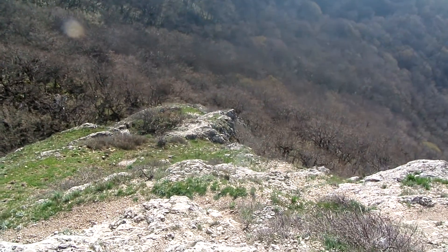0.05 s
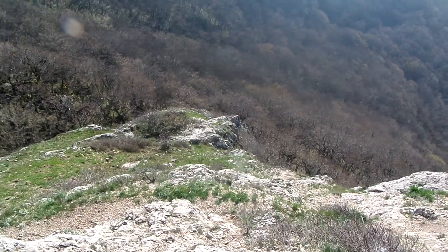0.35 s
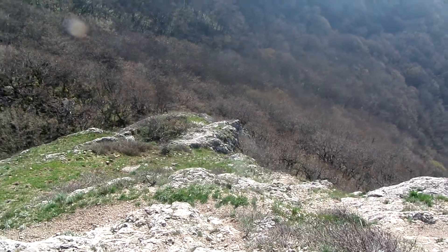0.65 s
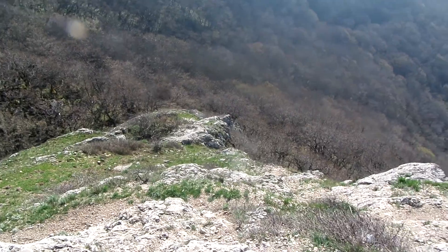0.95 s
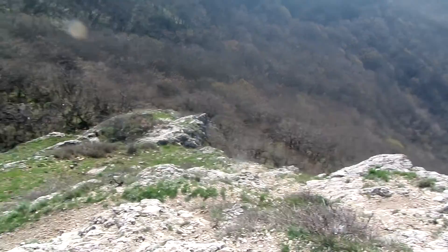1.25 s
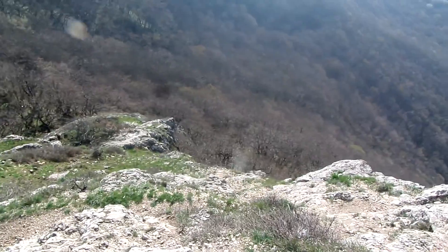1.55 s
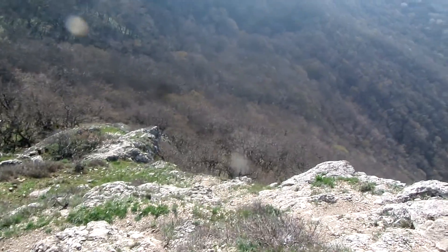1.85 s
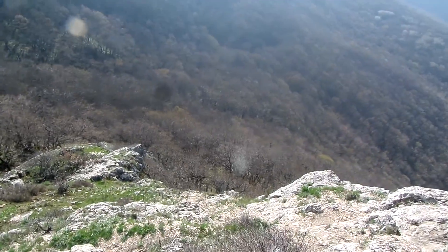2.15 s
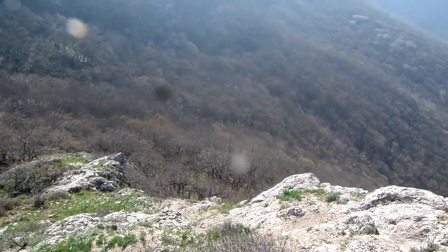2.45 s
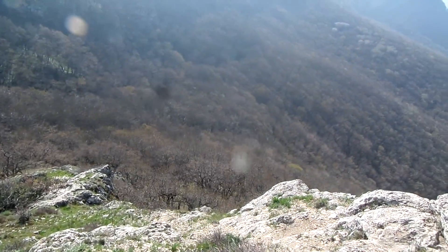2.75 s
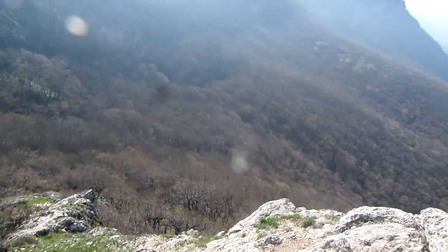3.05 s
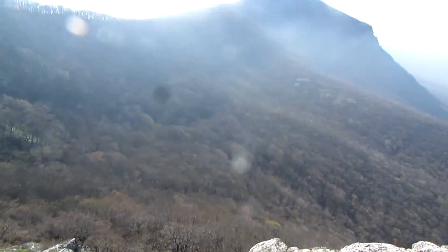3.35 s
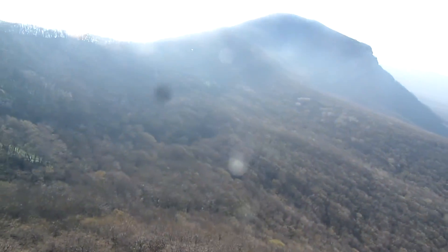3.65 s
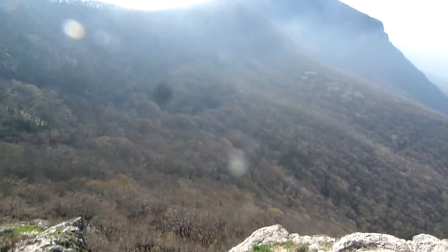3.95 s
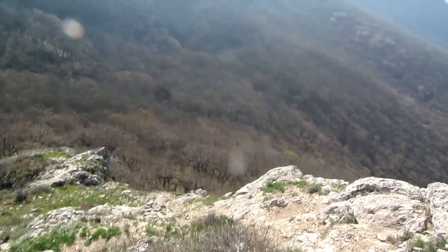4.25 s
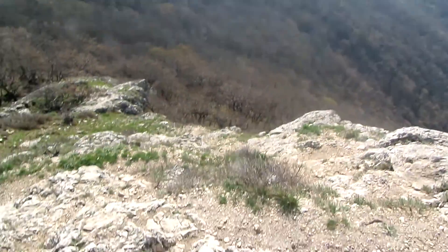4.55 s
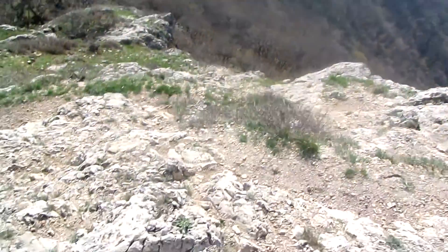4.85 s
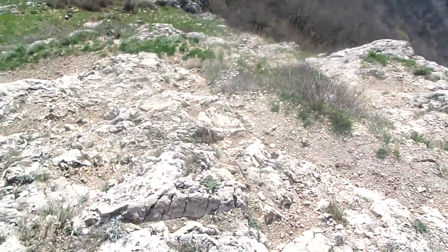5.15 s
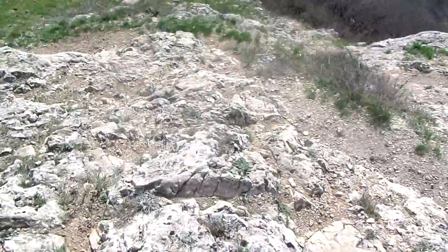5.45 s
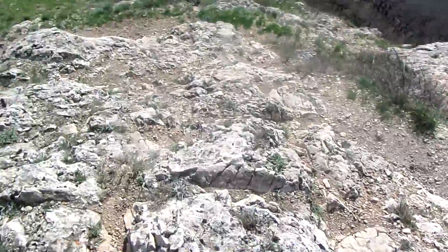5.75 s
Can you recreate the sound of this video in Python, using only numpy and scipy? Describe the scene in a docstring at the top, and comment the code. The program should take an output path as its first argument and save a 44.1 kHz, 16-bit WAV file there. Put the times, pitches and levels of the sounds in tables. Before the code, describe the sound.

On a quiet, stony hilltop, a soft breeze hisses in the grass and lightly buffets the microphone while small birds whistle far off. Close by, a shoe scrapes and crunches on grit, and a stone snaps loudly. Several quick dry scrapes follow. After that there are only faint rustles, scattered ticks of small stones and one light knock, as the gentle wind and birds carry on.

```python
"""A stony hilltop above a wooded valley, where someone shifts about with a small camera in hand.
Soft gusts murmur, hiss in the grass and buffet the microphone; small birds whistle and echo off a slope.
Close by, quick dry scrapes and crunching grit are made of thousands of tiny slips, and small stones tick.
One stone snaps loudly and another knocks, each ringing briefly; the snap makes the camera duck its level."""
import sys
import numpy as np
from scipy import signal
from scipy.fft import rfft, irfft, next_fast_len
from scipy.io import wavfile
from scipy.ndimage import uniform_filter1d

SR = 44100
rng = np.random.default_rng(int(sys.argv[2]) if len(sys.argv) > 2 else 0)


def int16_out(signal):
    """Quantize to a 16-bit WAV file."""
    q = np.round(np.clip(np.atleast_2d(signal).T, -1, 1) * 32767)
    wavfile.write(sys.argv[1], SR, q.astype(np.int16))


N = 265393
T = np.arange(N) / SR


def undb(db):
    """Decibels to gain."""
    return 10 ** (np.asarray(db) / 20)


def unit(x):
    """Scale to rms 1."""
    return x / (np.std(x) + 1e-12)


def shape(x, gain):
    """Filter by a function of frequency that gives the gain; rms 1."""
    size = next_fast_len(len(x))
    hz = np.maximum(np.arange(size // 2 + 1) * SR / size, 1)
    return unit(irfft(rfft(x, size) * gain(hz), size)[:len(x)])


def colour(x, points):
    """EQ through (Hz, dB) points joined on a log-frequency axis; rms 1."""
    f, db = np.transpose(points)
    return shape(x, lambda hz: undb(np.interp(np.log(hz), np.log(f), db)))


def band(x, centre_hz, octaves):
    """Keep a bell-shaped band."""
    return shape(x, lambda hz: np.exp(-.5 * (np.log2(hz / centre_hz) / octaves) ** 2))


def resonance(x, centre_hz, width_hz):
    """Ring a resonance with steep skirts."""
    return shape(x, lambda hz: 1 / (1 + ((hz - centre_hz ** 2 / hz) / width_hz) ** 2))


def add(out, s, x):
    """Mix x into out from time s."""
    i = max(int(s * SR), 0)
    out[i:i + len(x)] += x[:max(len(out) - i, 0)]


def clock(length):
    """Sample times of a short sound."""
    return np.arange(max(int(length * SR), 16)) / SR


def decay(t, t60):
    """A tail that falls 60 dB in t60 seconds."""
    return np.exp(-np.log(1000) * t / t60)


def walk(rate):
    """A smooth random drift through about rate values a second; rms 1."""
    hold = int(SR / rate)
    steps = np.repeat(rng.standard_normal(N // hold + 1), hold)
    return unit(uniform_filter1d(uniform_filter1d(steps, hold), hold)[:N])


def slips(rate, spread_db):
    """Friction: tiny slips at random moments, a few much larger than the rest."""
    clicks = (rng.random(N) < rate / SR) * rng.choice([-1, 1], N)
    return clicks * undb(spread_db * np.minimum(rng.exponential(size=N), 5))


def swells(table, octaves):
    """Short bands of noise that rise and fade smoothly."""
    out, t = np.zeros(N), clock(.6)
    t -= t.mean()
    for s, length, db, hz in table:
        swell = band(rng.standard_normal(len(t)), hz, octaves) * np.exp(-2 * (t / length) ** 2)
        out += undb(db) * np.interp(T - s, t, swell, left=0, right=0)
    return out


def strike(contacts, modes, push_s):
    """Each contact rings the same modes as its push builds; a small body radiates no deep bass."""
    out, t = np.zeros(N), clock(.06)
    ring = sum(undb(db) * decay(t, t60) * np.sin(2 * np.pi * hz * t) for hz, db, t60 in modes)
    for s, db in contacts:
        add(out, s, undb(db) * ring * (1 - np.exp(-t / push_s)))
    return signal.sosfilt(signal.butter(2, 85, "high", fs=SR, output="sos"), out)


# EQ curves of the three wind layers. Each row: frequency in Hz, gain in dB.
VALLEY_EQ = [(20, -17.5), (60, -6.5), (140, -0.5), (230, 0.5), (310, 0), (400, 0.5), (520, -2), (700, -8),
             (1100, -17), (3000, -38)]
GRASS_EQ = [(200, -17), (600, -0.5), (950, 0), (1700, -2), (2700, -3), (4500, -5.5), (6500, -10),
            (10000, -19.5)]
HISS_EQ = [(1000, -34.5), (3500, -10.5), (5500, 1.5), (8500, 1), (12000, 2), (15000, 1), (16000, 0)]
# Soft gusts. Each row: peak time and spread in seconds, then valley, grass and hiss levels in dB.
GUSTS = [(.1, 0.28, -64, -64.5, -77), (.7, .19, -63, -56.5, -58), (3.08, 0.22, -59, -64.5, -63),
         (4.62, 0.34, -57.5, -59.5, -61.5), (6.0, 0.32, -62, -60, -57)]


def breeze():
    """Gusts swell over calm air: a murmur in the valley, the near grass and, just after, a fine hiss."""
    out = np.zeros(N)
    layers = [(VALLEY_EQ, -63, 0), (GRASS_EQ, -64, 0), (HISS_EQ, -64.5, 0.13)]
    for k, (eq, calm_db, lag_s) in enumerate(layers):
        gust_power = sum(undb(levels[k]) ** 2 * np.exp(-.5 * ((T - peak - lag_s) / spread) ** 2)
                         for peak, spread, *levels in GUSTS)
        flicker = undb(.5 * walk(8.1))
        out += np.sqrt(undb(calm_db) ** 2 + gust_power) * flicker * colour(rng.standard_normal(N), eq)
    return out


# Low puffs of wind. Each row: peak time and length in seconds, level in dB, pitch in Hz.
BUFFETS = [(.06, 0.14, -59, 44.6), (.26, 0.054, -54, 44.7), (.35, 0.067, -59, 45), (1.91, 0.082, -65, 50),
           (2.61, 0.034, -66, 64), (3.8, .11, -63, 38), (3.805, 0.048, -56.5, 106)]


def buffets():
    """Wind hits the microphone in short, soft rumbles."""
    return swells(BUFFETS, octaves=0.48)


def whistle(length, start_hz, glide, waver):
    """One wavering note that holds its pitch at first, then slides ever faster by glide octaves."""
    progress = clock(length) / length
    wobble = unit(uniform_filter1d(rng.standard_normal(len(progress)), size=160))
    hz = start_hz * 2 ** (glide * progress ** 1.6) * (1 + waver * wobble)
    return np.abs(np.sin(np.pi * progress)) ** 0.33 * np.sin(2 * np.pi * np.cumsum(hz) / SR)


# Single calls. Each row: start and length in seconds, pitch in Hz, glide in octaves, level in dB.
BIRD_CALLS = [(0.112, 0.034, 3710, -.1, -62), (.13, 0.084, 3170, -0.089, -65),
              (0.117, 0.14, 7040, -0.011, -65.5), (.33, 0.18, 3160, -.07, -66),
              (1.374, 0.22, 3590, -0.026, -61.5), (2.852, 0.091, 7700, -.12, -70),
              (4.55, 0.089, 4220, -0.012, -64), (4.585, .04, 7660, -.12, -63), (4.668, .03, 4750, 0, -62),
              (4.716, .06, 6650, -.02, -66), (4.744, .035, 6470, -.2, -64),
              (4.89, 0.029, 5720, -0.055, -60), (4.933, .036, 6800, -.06, -53.5),
              (4.963, 0.041, 6580, -.2, -60), (5.102, 0.11, 5270, -0.15, -60), (5.168, 0.082, 3670, 0, -58),
              (5.494, 0.023, 7220, 0.063, -53), (5.733, .15, 3335, -0.018, -63.5),
              (5.835, 0.045, 5800, -0.23, -65)]
# Far, rapid song. Each row: start and end in seconds, level in dB, centre pitch in Hz.
TRILLS = [(0.02, .168, -60, 4400), (2.803, 3.1, -62, 4430), (3.102, 3.45, -60.5, 4800)]


def birds(echo_db, echo_t60, notes_per_s=15):
    """Whistled glides and runs of far, warbled notes; the wooded slope scatters them back."""
    out = np.zeros(N)
    for s, length, hz, glide, db in BIRD_CALLS:
        add(out, s, undb(db) * whistle(length, hz, glide, waver=0.011))
    for start, end, db, hz in TRILLS:
        for s in np.arange(start, end, 1 / notes_per_s):
            detune, bend = rng.uniform(-1, 1, 2)  # every note has its own contour
            note = whistle(.6 / notes_per_s, hz * (1 + .12 * detune), 0.248 * bend, waver=0.0802)
            add(out, s + .015 * rng.random(), undb(db) * note)
    t = clock(1)
    echo = rng.standard_normal(len(t)) * decay(t, echo_t60) * (1 - np.exp(-t / 0.018))
    return out + undb(echo_db) * signal.fftconvolve(out, echo / np.linalg.norm(echo))[:N]


# Faint rustles. Each row: peak time and length in seconds, level in dB, pitch in Hz.
RUSTLES = [(.69, 0.26, -60.5, 1050), (2.02, 0.18, -68.5, 3500), (3.0, 0.29, -68, 2200),
           (3.968, 0.015, -56, 2670), (4.07, .04, -64, 2800), (4.265, 0.034, -58.5, 2750),
           (4.455, 0.032, -61, 2580), (4.612, 0.022, -56.5, 2630), (4.695, 0.016, -56.5, 2700),
           (5.33, 0.16, -61.5, 2930)]


def rustles():
    """A gust swelling in the grass and small movements make narrow, breathy swells of noise."""
    return swells(RUSTLES, octaves=0.31)


# The bump's hit. Each row: time in seconds, strength in dB.
BUMP_HITS = [(2.4642, -32.5)]
# Its low body. Each row: pitch in Hz, level in dB, seconds to fall 60 dB.
BUMP_MODES = [(134, 7.5, 0.0066), (310, 1, 0.0086)]


def bump():
    """One soft contact gives a low thud that dies at once."""
    return strike(BUMP_HITS, BUMP_MODES, push_s=0.00035)


# EQ curves of a scrape's bright body and the dull rub below. Each row: frequency in Hz, gain in dB.
SCRAPE_EQ = [(100, -24), (1000, -35), (1900, -5.5), (2550, 6), (3300, 0.5), (4400, 2.5), (5400, 3.5),
             (6200, -0.5), (7500, 0.5), (10000, -5), (16000, -45)]
SCUFF_EQ = [(30, -8.5), (140, 7.5), (400, 4.5), (800, 5), (1200, -2), (1650, -2), (2400, -2.5), (8000, -16)]
# Dry strokes. Each row: start, end and fade in seconds, level in dB, relative speed, hollow tone in dB.
SCRAPES = [(0.992, 1.19, 0.047, -42, 1.325, -15.5), (1.444, 1.525, 0.031, -54, 0.71, -16),
           (1.618, 1.675, 0.024, -61, 0.93, 0), (1.835, 1.977, 0.058, -40.5, 0.93, -19),
           (2.03, 2.17, 0.053, -50.5, 0.92, -16), (2.158, 2.265, 0.061, -52, 1.0, -8.5),
           (2.278, 2.463, 0.069, -50, 1.18, -4), (2.446, 2.512, .026, -52, 1.32, -28)]


def scrapes(firm_db=-43, ring_hz_per_db=19, sag_db_per_s=14):
    """Dense slips excite a body and two resonances; faster strokes gain scuff and a brighter hiss."""
    out = np.zeros(N)
    friction = [slips(rate=14000, spread_db=3.0) for _ in range(5)]
    grip = undb(2.6 * walk(70))  # the contact catches unevenly, so the ring flutters
    for start, end, fade, db, speed, hollow_db in SCRAPES:
        t = clock(end - start)
        body, ring, hollow, hiss, scuff, catch = (x[int(start * SR):][:len(t)] for x in friction + [grip])
        ring_hz = 3260 + ring_hz_per_db * (db - firm_db)  # lighter strokes ring lower
        ring = undb(-1.5) * catch * resonance(ring, ring_hz, width_hz=750)
        hollow = undb(hollow_db) * resonance(hollow, centre_hz=1510, width_hz=750)
        top_hz = 11570 * speed
        hiss = shape(hiss, lambda hz: ((1 + (0.67 * top_hz / hz) ** 7) * (1 + (hz / top_hz) ** 24)) ** -.5)
        hiss *= undb(-1.5 + 19.5 * np.log2(speed))
        scuff = undb(-12.5 + 21 * np.log2(speed)) * colour(scuff, SCUFF_EQ)
        stroke = colour(body, SCRAPE_EQ) + ring + hollow + hiss + scuff
        ramp = np.clip(np.minimum(t / 0.96, t[-1] - t) / fade, 0, 1)  # bites a touch faster than it fades
        pressure = np.sin(np.pi / 2 * ramp) ** 2.14
        add(out, start, undb(db - sag_db_per_s * (t - t.mean())) * pressure * stroke)
    return out


# EQ curve of grinding grit. Each row: frequency in Hz, gain in dB.
GRIT_EQ = [(470, -38.5), (800, -23.5), (1120, -14), (1760, -17), (1920, -11), (2660, -4.5), (3140, 0.5),
           (3560, -1.5), (5240, -2), (6910, -5), (12900, -37), (14700, -38.5), (16000, -40.5)]
# Presses of a sole. Each row: moments of full weight and of lift in seconds, level in dB.
CRUNCHES = [(1.166, 1.299, -39), (1.332, 1.339, -41)]


def crunch(press_db_per_s=1200, ease_db_per_s=33, lift_db_per_s=195):
    """Grit grinds as the weight comes on, eases and lifts; the scuff peaks as the sole first settles."""
    weight = np.zeros(N)
    for start, lift, db in CRUNCHES:
        slack_db = np.maximum(press_db_per_s * (start - T), ease_db_per_s * (T - start))
        weight += undb(db - slack_db - lift_db_per_s * np.maximum(T - lift, 0))
    flutter = undb(0.99 * walk(120))
    grains = colour(slips(rate=10000, spread_db=2.5), GRIT_EQ)
    settle = 1 + 2.5 * np.exp(-((T - CRUNCHES[0][0]) / 0.014) ** 2)
    scuff = undb(-11) * settle * colour(rng.standard_normal(N), SCUFF_EQ)
    return weight * flutter * (grains + scuff)


# Small stones ticking; the row at 1.3132 s adds the snap's high crack. Each row: time in seconds, peak level in
# dB, pitch in Hz.
TICKS = [(1.165, -22, 5200), (1.218, -20.5, 4900), (1.233, -27, 5500), (1.259, -30, 5500),
         (1.3089, -13, 4070), (1.3132, -21, 11000), (1.383, -32, 3980), (1.411, -35, 5460),
         (1.5159, -30.5, 2830), (1.6346, -39, 3000), (1.823, -30.5, 9700), (2.1317, -37, 1690),
         (2.466, -36.5, 3300), (3.322, -43.5, 2600), (3.9615, -39, 2650), (3.967, -45, 3830),
         (4.9653, -39, 3260), (5.3097, -38.5, 3360), (5.31, -34, 11500), (5.328, -37, 11500)]


def ticks(decay_cycles=26, lead_s=.002):
    """Each tick gives a crack that dies within milliseconds, sooner the higher it is."""
    out = np.zeros(N)
    t = clock(.03) - lead_s
    for s, db, hz in TICKS:
        burst = rng.standard_normal(len(t)) * (t >= 0) * decay(np.abs(t), decay_cycles / hz)
        crack = band(burst, hz, octaves=0.58)
        add(out, s - lead_s, undb(db) * crack / np.abs(crack).max())
    return out


# The knock's two hits. Each row: time in seconds, strength in dB.
KNOCK_HITS = [(4.8541, -23), (4.8574, -38)]
# That stone's duller ring. Each row: pitch in Hz, level in dB, seconds to fall 60 dB.
KNOCK_MODES = [(235, -14.5, 0.044), (636, -3.5, 0.015), (1000, -8.5, 0.017), (2140, 4.5, 0.0091),
               (2770, 5.5, 0.0059), (3070, 7, 0.0057), (3950, -11, 0.012), (5040, -17, 0.0087),
               (8800, -2, 0.0027)]


def stone_knock():
    """A stone knocks and touches again lightly, ringing for an instant."""
    return strike(KNOCK_HITS, KNOCK_MODES, push_s=0.00061)


# The snap's three hits. Each row: time in seconds, strength in dB.
SNAP_HITS = [(1.31295, 5.5), (1.3135, 1), (1.3148, -13)]
# That stone's bright ring. Each row: pitch in Hz, level in dB, seconds to fall 60 dB.
SNAP_MODES = [(746, -28, 0.013), (1620, -32.5, 0.011), (2540, -17, 0.016), (3280, -11.5, 0.0078),
              (4000, -3.5, 0.0058), (4350, -8, 0.0083), (5404, 5, 0.0041), (7090, -6.5, 0.007),
              (8250, -6, 0.0087), (11340, -13, 0.0033)]


def stone_snap():
    """Hard contacts within two milliseconds fuse into one loud, sharp snap."""
    return strike(SNAP_HITS, SNAP_MODES, push_s=0.0013)


def scene():
    """Everything reaches the closely spaced microphones alike."""
    stones = stone_snap() + stone_knock() + ticks()
    nearby = scrapes() + crunch() + rustles() + bump()
    outdoors = breeze() + buffets() + birds(echo_db=-1.5, echo_t60=1.8)
    return np.tile(stones + nearby + outdoors, (2, 1))


def record(dry):
    """The camera rounds off the loudest peak, ducks after it, recovers slowly and cuts the top."""
    ceiling, top_hz = 0.62, 15750
    threshold_db, attack_s, recover_db_per_s = -7.5, 0.0075, 2.5
    rounded = dry / (1 + (dry / ceiling) ** 4) ** .25
    peak_db = 20 * np.log10(np.abs(rounded).max(axis=0) + 1e-9)
    over_db = np.maximum(peak_db - threshold_db, 0)
    duck_db = np.maximum.accumulate(over_db + recover_db_per_s * T) - recover_db_per_s * T
    pole = np.exp(-1 / (attack_s * SR))
    ducked = rounded * undb(-signal.lfilter([1 - pole], [1, -pole], duck_db))
    return signal.sosfilt(signal.ellip(10, .1, 80, top_hz, fs=SR, output="sos"), ducked)


dry = scene()
out = record(dry)
int16_out(out)
```